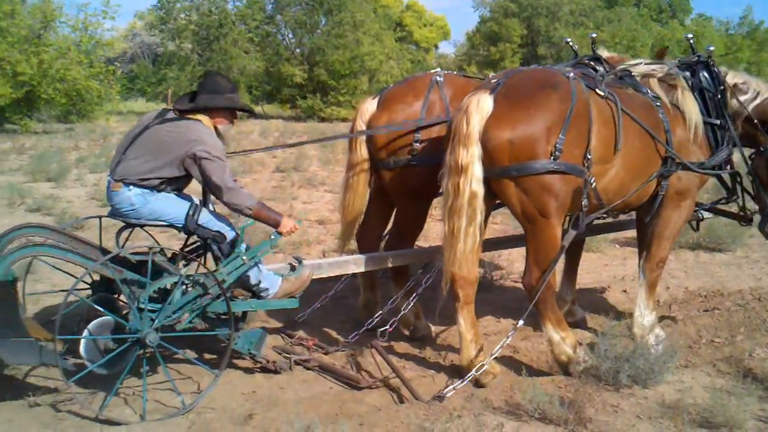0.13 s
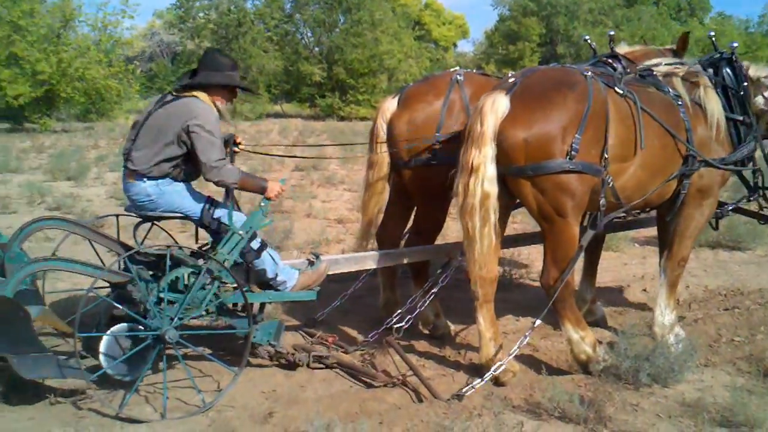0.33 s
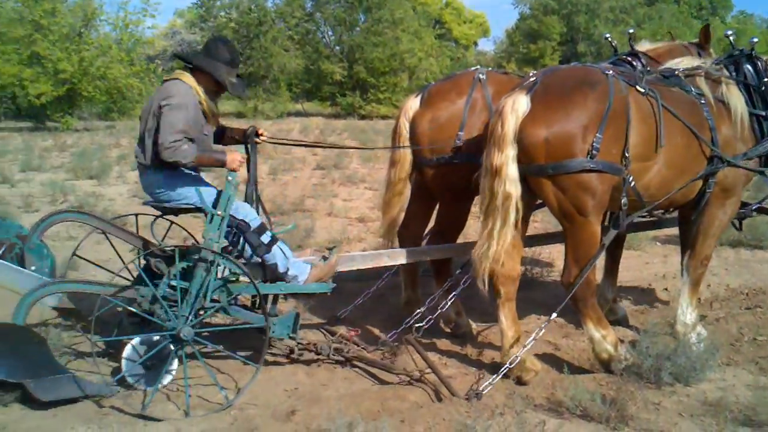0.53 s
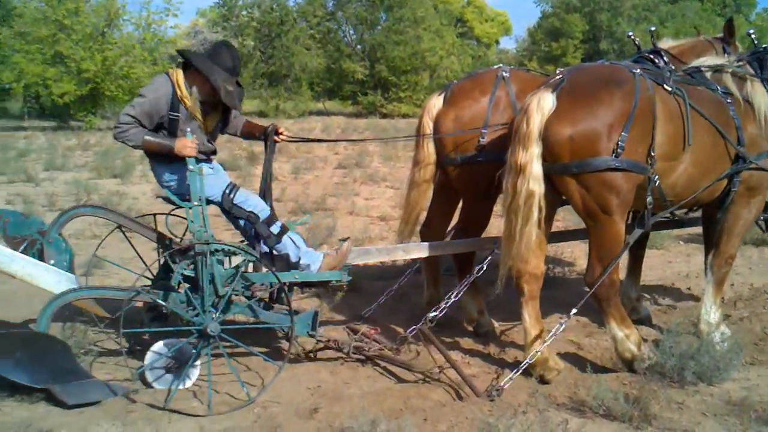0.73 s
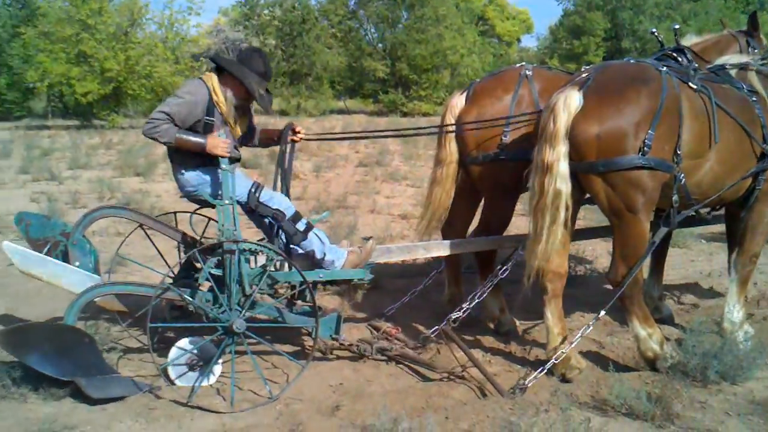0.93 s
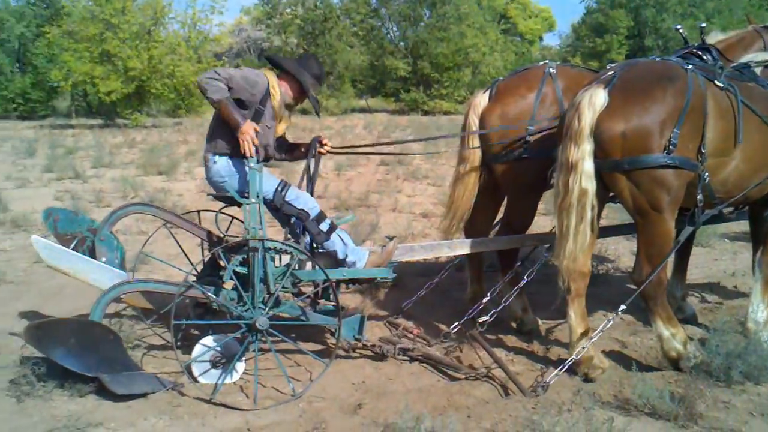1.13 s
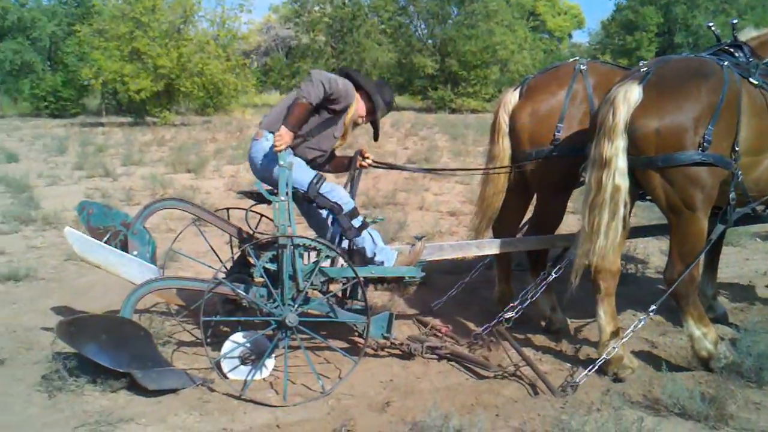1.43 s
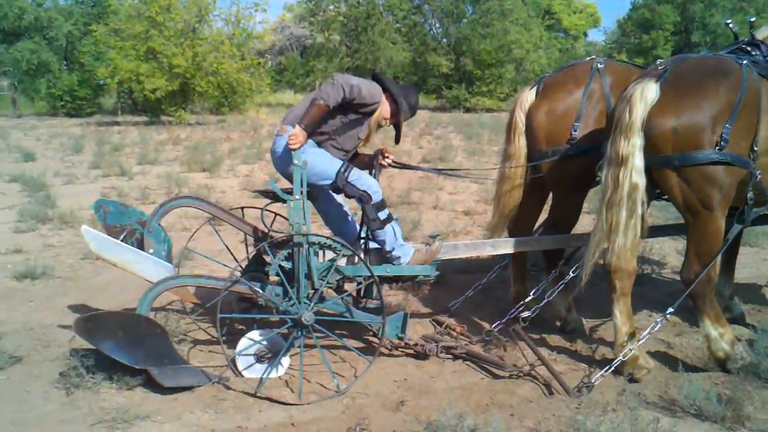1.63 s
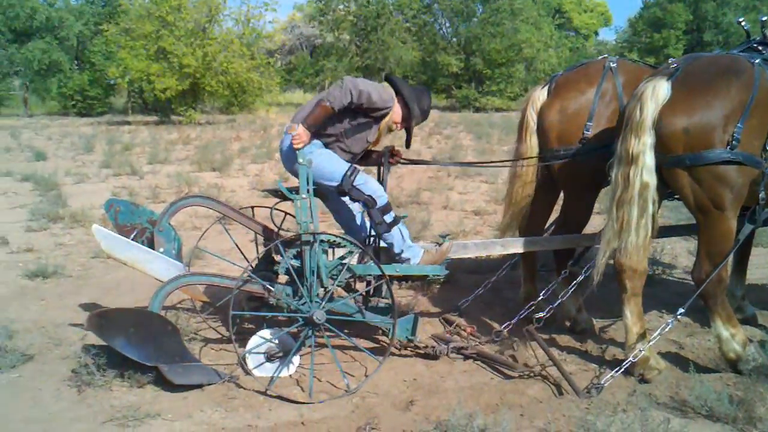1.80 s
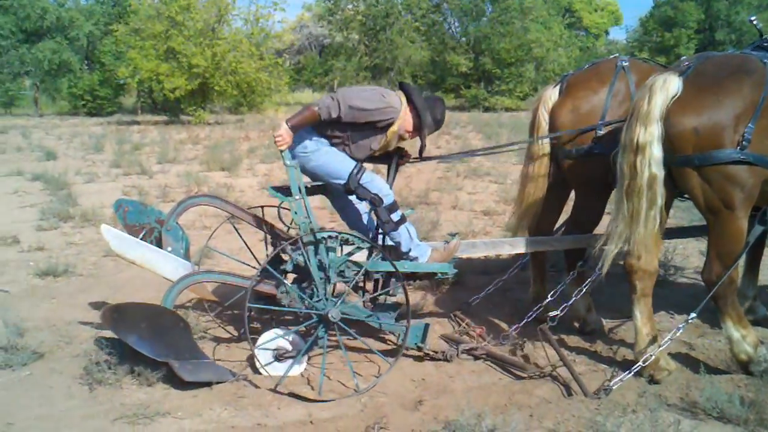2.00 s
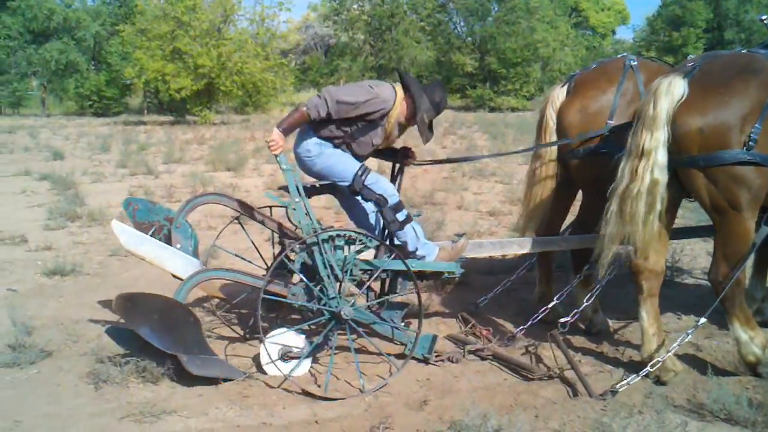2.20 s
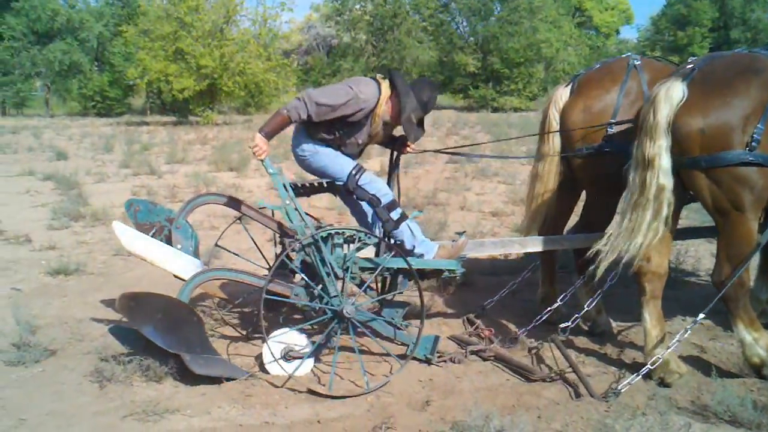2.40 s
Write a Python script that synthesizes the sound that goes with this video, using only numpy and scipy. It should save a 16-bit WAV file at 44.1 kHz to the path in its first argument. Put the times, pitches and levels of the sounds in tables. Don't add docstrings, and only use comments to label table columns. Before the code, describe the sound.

An iron plow lever clatters back through its notches, then settles with clacks in a quiet field

```python
import sys
import numpy as np
from scipy import signal
from scipy.fft import rfft, irfft, next_fast_len
from scipy.io import wavfile
from scipy.ndimage import uniform_filter1d

SR = 44100
rng = np.random.default_rng(int(sys.argv[2]) if len(sys.argv) > 2 else 0)


def invert_db(x):
    u = np.asarray(x, float) / 20
    return 10 ** u


def unload_audio(sound):
    columns = np.transpose(np.atleast_2d(sound))
    steps = np.round(np.clip(columns, -1, 1) * 32767)
    wavfile.write(sys.argv[1], SR, steps.astype(np.int16))


N = 112454

# [t/s, level/dB, low share/dB, treble share/dB, length/s]
PULL_KNOCKS = [(0.008, -31, -9.5, -11, 0.019), (0.031, -36, -3.5, -5.5, 0.0092),
               (0.103, -47, 18.5, -10, 0.018), (0.124, -57.5, 19.5, -20, 0.12),
               (0.1868, -48, 18, -30, 0.029), (0.205, -41.5, 8, -12, 0.11), (0.2339, -27, -2.5, -5, 0.046),
               (0.307, -23.5, -6.5, -11, 0.013), (0.398, -20, -4.5, -25, 0.01),
               (0.459, -25.5, 1, -19, 0.02), (0.511, -28, -30, -8, 0.014), (0.5556, -15.5, -5.5, -2, 0.035),
               (0.586, -16, -11.5, -4.5, 0.014), (0.633, -21, 0, -11, 0.014), (0.644, -24, 1.5, -3, 0.023),
               (0.655, -19.5, -5.5, -5.5, 0.037), (0.685, -23, 9, -16, 0.042), (0.717, -35, -1, -27, 0.029),
               (0.726, -18.5, -15, -6, 0.02), (0.735, -18.5, -5, -1, 0.03), (0.7634, -27, 3, -24, 0.051),
               (0.818, -46, 11, -23, 0.0089), (0.904, -36.5, 5, -24, 0.019), (1.018, -45, 1.5, -36, 0.076)]
# [t/s, level/dB, low share/dB, treble share/dB, length/s]
DROP_KNOCKS = [(1.133, -50, 11, -12, 0.0084), (1.151, -51, 2, -11, 0.018), (1.164, -45, 10, -6, 0.02),
               (1.19, -50.5, 17, -3, 0.035), (1.249, -36, -23, -17, 0.022), (1.433, -54, 7, -30, 0.021),
               (1.277, -69, 26, -5, 0.017), (1.4497, -41.5, -10.5, -46, 0.026),
               (1.713, -74, 13, -20, 0.0061), (1.79, -59, 7, -30, 0.02), (1.76, -44, 4.5, -31, 0.007),
               (1.798, -41, -4, -44, 0.015), (1.852, -29.5, -23, -4, 0.0065),
               (1.9131, -27.5, -3, -8.5, 0.048), (1.9685, -19, -13.5, -3, 0.025),
               (2.023, -25, -33, -10, 0.012), (2.094, -16, -13, -9.5, 0.041), (2.13, -39, -32, 5, 0.018),
               (2.185, -24, -2.5, -46, 0.013), (2.2843, -22, -14, -6, 0.036), (2.309, -45, -23, -18, 0.021),
               (2.3546, -32.5, -5, -22, 0.07), (2.477, -46, 6, -18, 0.016), (2.211, -42.5, -5, -2, 0.015),
               (2.516, -48, -8, -4.5, 0.035), (2.5424, -65, -18, -8, 0.028)]
# [centre t/s, level/dB, low share/dB, treble share/dB, half length/s]
SCRAPES = [(0.063, -46.5, 10.5, -26, 0.041), (0.233, -32, -3, -2.5, 0.038), (0.349, -24, -1, -6.5, 0.03),
           (0.43, -20.5, -1.5, -7, 0.031), (0.508, -34.5, 8.5, -6, 0.048), (0.592, -29.5, 3, -24, 0.025),
           (0.724, -13, -2, -6.5, 0.013), (0.668, -18.5, -4, -7.5, 0.012), (0.64, -34, -9.5, -4, 0.018),
           (0.822, -37, 2, -30, 0.036), (0.858, -28.5, -7, -7, 0.032), (0.911, -48, 10, -20, 0.081),
           (0.96, -33, -9, -10.5, 0.028), (1.018, -43, 13.5, -43, 0.031), (1.153, -58.5, 15, -6, 0.086),
           (1.288, -75.5, 26.5, -12, 0.073), (1.826, -55, 13, -30, 0.013), (1.898, -54, 7, -30, 0.0073),
           (0.627, -40.5, 11, -8, 0.024), (1.874, -53, 15.5, -39, 0.045), (1.97, -6, -14, -5, 0.0047),
           (1.992, -28, 0.5, -30, 0.053), (2.064, -32, -7, -5.5, 0.045), (2.149, -36, 0.5, -15, 0.073),
           (2.235, -32, -5.5, -12.5, 0.026), (2.317, -29.5, -4.5, -14, 0.048)]
# [t/s, f/Hz, level/dB, t60/s]
LINK_CHINKS = [(.11, 5530, -46, .08), (.25, 5530, -32, .15), (.25, 3620, -38, .15), (.33, 5530, -34, .12),
               (.73, 10890, -35, .6), (.76, 11230, -42, .45), (.74, 10176, -40, .3), (.768, 3779, -36, .2),
               (.815, 7500, -40, .08), (.835, 12430, -45, .2), (.835, 9281, -38, .12), (.81, 9803, -38, .3),
               (1.219, 9270, -39, .2), (1.205, 12450, -48, .15), (1.225, 8080, -48, .2),
               (1.2, 4829, -54, .6), (1.28, 2450, -48, .25), (1.86, 6600, -50, .2), (1.985, 5530, -32, .12),
               (2.034, 12300, -38, .1), (2.115, 4470, -33, .06), (2.13, 7800, -38, .08),
               (2.21, 9290, -40, .12), (2.215, 12400, -45, .12), (2.3, 3700, -35, .08),
               (2.36, 3600, -46, .3), (2.543, 4800, -46, .1), (.915, 322, -39, .25), (1.855, 580, -42, .2),
               (1.87, 720, -45, .12), (1.725, 450, -50, .08), (1.972, 3300, -20, .04),
               (1.192, 500, -40, .08), (2.197, 690, -36, .06), (.112, 900, -40, .05),
               (.236, 2100, -30, .04), (2.035, 3000, -32, .04), (1.445, 2000, -50, .15),
               (1.138, 330, -40, .06), (.575, 226, -38, .3), (.582, 1235, -23, .1)]
# [f/Hz, width/Hz, level/dB]
FRAME_MODES = [(314.4, 59, -4), (562.5, 30, -8.5), (713, 164, 2.5), (1202, 224, 2), (1527, 60, -9),
               (2054, 24, -11.5), (2480, 720, -17), (3750, 34, -52), (5820, 18, -18.5)]
# [f/Hz, level/dB]
CONTACT_COLOUR = [(70, -6.5), (300, -45), (700, -10), (2200, -4), (4000, -6.5), (10200, -5.5), (11000, -13),
                  (14000, -14)]
# [f/Hz, level/dB]
AIR_COLOUR = [(30, -35), (110, 3.5), (300, -4), (1000, -16.5), (2000, -21), (5000, -27.5), (8000, -28.5),
              (14000, -25.5)]

RISE_S = 0.0014
LOW_HZ, HIGH_HZ = 1480, 6000
EDGE_HZ = 13950


def evened(x):
    return x / np.sqrt(np.mean(x ** 2) + 1e-20)


def colour(x, gain):
    size = next_fast_len(N + 4096)
    return irfft(rfft(x, size) * gain(np.fft.rfftfreq(size, 1 / SR)), size)[..., :N]


def shape(points):
    f, db = np.transpose(points)
    return lambda hz: invert_db(np.interp(np.log(hz + 1), np.log(f), db))


def smooth_twice(x, size, axis=-1):
    return uniform_filter1d(uniform_filter1d(x, size=size, axis=axis), size=size, axis=axis)


def mode(x, hz, width):
    r = np.exp(-np.pi * width / SR)
    return signal.lfilter([np.sqrt(2 * (1 - r * r))], [1, -r * np.exp(2j * np.pi * hz / SR)], x).real


def contact_strengths():
    crack, crack_s = 0.8, 0.004
    fade_db, fade_bend = -14, 1.1
    linger_db, linger_t60 = -23, 0.22
    t, rows = np.arange(N) / SR, []
    for start, db, _, _, length in PULL_KNOCKS + DROP_KNOCKS:
        u = np.maximum(t - start - 2 * RISE_S, 0)
        fade = crack * np.exp(-u / crack_s)
        fade += invert_db(fade_db * (u / length) ** fade_bend)
        fade += invert_db(linger_db - 60 * u / linger_t60)
        rows.append(invert_db(db - 10) * np.minimum(u / RISE_S, 1) * fade)
    for centre, db, _, _, half in SCRAPES:
        rows.append(invert_db(db - 9 + fade_db * ((t - centre) / half) ** 2))
    return np.array(rows)


def contact_noise():
    ticks_per_s, tick_spread_db, grit = 1800, 3, 1.6
    likeness = 0.37
    tick_size = invert_db(tick_spread_db * np.minimum(rng.exponential(1, N), 4))
    ticks = tick_size * (rng.random(N) < ticks_per_s / SR)
    a, b = rng.standard_normal((2, N))
    noise = np.array([a, likeness * a + np.sqrt(1 - likeness ** 2) * b])
    return evened((grit + evened(uniform_filter1d(ticks, size=20))) * noise)


def iron():
    low_rise = 260
    modes_db, mode_luck_db = -10.5, 3
    rows = contact_strengths()
    table = np.array(PULL_KNOCKS + DROP_KNOCKS + SCRAPES)
    low_db, high_db = table[:, 2], table[:, 3]
    slow = uniform_filter1d(rows, low_rise, origin=low_rise // 2 - 1)
    strong, bright = rows.sum(0), invert_db(high_db) @ rows
    drive = contact_noise()

    def low(hz):
        return 1 / (1 + (hz / LOW_HZ) ** 4)

    def high(hz):
        return 1 - 1 / (1 + (hz / HIGH_HZ) ** 6)

    bare = colour(drive * (invert_db(low_db) @ slow), lambda hz: 2 * low(hz))
    bare += colour(drive * bright, lambda hz: 2 * high(hz))
    bare += colour(drive * strong, lambda hz: 1 - low(hz) - high(hz))
    out = colour(2 * bare, shape(CONTACT_COLOUR))

    luck_db = mode_luck_db * rng.standard_normal((len(rows), len(FRAME_MODES)))
    for k, (hz, width, db) in enumerate(FRAME_MODES):
        share_db = low_db if hz < LOW_HZ else 0
        push = invert_db(modes_db + db + share_db + luck_db[:, k]) @ slow
        out += mode(drive * push, hz, width)
    return out + small_parts(strong, 2 * bright)


def small_parts(strong, bright):
    parts, lowest_hz, highest_hz = 48, 1700, 13300
    taps_per_s, width_hz, level_db = 40, 50, 5
    out = np.zeros((2, N))
    for hz, luck in zip(np.geomspace(lowest_hz, highest_hz, parts), rng.random((parts, 3))):
        taps = (rng.random(N) < taps_per_s / SR) * rng.standard_normal(N)
        taps = taps * np.sqrt(SR / taps_per_s / parts) * (bright if hz > HIGH_HZ else strong)
        turn = np.exp(2j * np.pi * luck[2] * np.array([[0], [1]]))
        out += mode(taps * turn, hz * (1 + 0.032 * luck[0]), width_hz * (0.5 + luck[1]))
    return invert_db(level_db) * colour(out, shape(CONTACT_COLOUR))


def chinks():
    twin = 0.5
    t, out = np.arange(N) / SR, np.zeros((2, N))
    for (start, hz, db, t60), luck in zip(LINK_CHINKS, rng.random((len(LINK_CHINKS), 3))):
        u = np.maximum(t - start, 0)
        tone = np.sin(2 * np.pi * (hz * u + luck[:2, None]))
        tone += twin * np.sin(2 * np.pi * (hz + 15 + 40 * luck[2]) * u)
        out += np.minimum(u / RISE_S, 1) * invert_db(db - 60 * u / t60) * tone
    return out


def air():
    level_db, gust_db = -52.5, 2.5
    noise = colour(rng.standard_normal((2, N)), shape(AIR_COLOUR))
    gusts = evened(smooth_twice(rng.standard_normal(N), 1500))
    wind = colour(noise, lambda hz: 1 / (1 + (hz / 500) ** 4))
    return invert_db(level_db) * evened(noise - wind + wind * invert_db(gust_db * gusts))


def spread(x, lift):
    comb_s, steep, lift_hz = 0.00038, 1.35, 770

    def share(hz):
        turn = np.pi * hz * comb_s + lift * np.exp(-(hz / lift_hz) ** 2)
        centre_leak = 0.5 * np.minimum(hz / 7000, 1) ** 1.5
        width_leak = 0.33 * hz / EDGE_HZ
        centre = abs(np.sin(turn)) ** steep + centre_leak
        width = (abs(np.cos(turn)) ** steep + width_leak) * np.sign(np.cos(turn))
        return np.array([centre, width]) / np.hypot(centre, width)

    mid, side = colour(x, share)
    return np.array([mid + side, mid - side]) / np.sqrt(2)


def thin_out(x):
    skip_db = np.array([9.5, 12.5])[:, None, None]
    skip_db_per_octave, skip_luck_db = -2.2, 3
    starve_hz, starve_db = 9800, 13
    hz, _, z = signal.stft([x[0] + x[1], x[0] - x[1]], SR, nperseg=1024)
    hz = hz[:, None]
    power = uniform_filter1d(uniform_filter1d(abs(z) ** 2, size=7, axis=1), size=5, axis=2)
    gap_db = 10 * np.log10(abs(power[::-1] / power))
    luck = uniform_filter1d(rng.standard_normal(z.shape), size=30, axis=1)
    luck = evened(uniform_filter1d(luck, size=6, axis=2))
    loud_db = 10 * np.log10((abs(z) ** 2).sum((0, 1)))
    attack_db = np.maximum(loud_db - np.roll(loud_db, shift=2), 0)
    limit_db = attack_db + skip_db + skip_db_per_octave * np.log2((hz + 100) / 2600)
    limit_db = limit_db + skip_luck_db * luck
    keep = (gap_db < limit_db)[:, 2::4, ::2].repeat(4, axis=1).repeat(2, axis=2)
    keep = np.pad(keep, ((0, 0), (0, 1), (0, 0)))[..., :z.shape[2]]
    coming_db = np.roll(loud_db, shift=-2) - loud_db
    z = z * ~((hz > starve_hz) & (coming_db > starve_db))
    mid, side = signal.istft(z * keep, SR, nperseg=1024)[1][:, :N]
    return np.array([mid + side, mid - side]) / 2


def scene():
    plow = colour(iron() + chinks(), lambda hz: 1 - 1 / (1 + (hz / 140) ** 3))
    return spread(plow, 0.76) + spread(air(), 0.19)


def top_cut(x):
    return signal.sosfilt(signal.butter(12, 14920, fs=SR, output="sos"), x)


def record(dry):
    lean_hz, lean_width_hz, lean_db = 1990, 460, 2.5
    ports = np.array([[-1], [1]])

    def lean(hz):
        return invert_db(lean_db * np.exp(-((hz - lean_hz) / lean_width_hz) ** 2) * ports)

    edged = colour(dry, lambda hz: 1 / np.sqrt(1 + (hz / EDGE_HZ) ** 300))
    mix = thin_out(colour(edged, lean))
    return top_cut(mix)


dry = scene()
out = record(dry)
unload_audio(out)
```